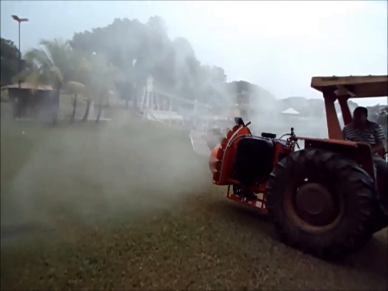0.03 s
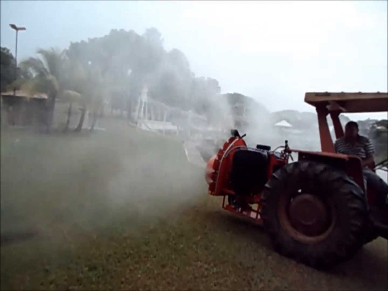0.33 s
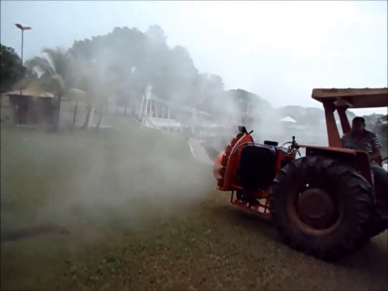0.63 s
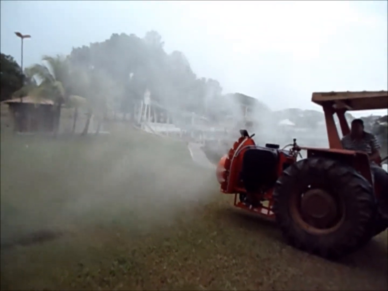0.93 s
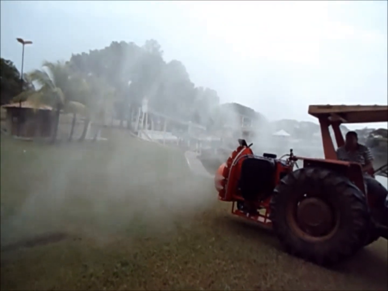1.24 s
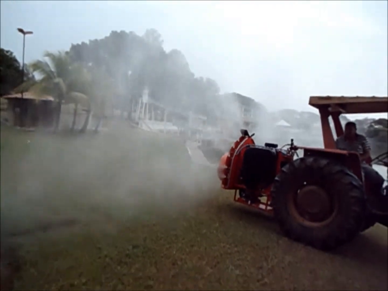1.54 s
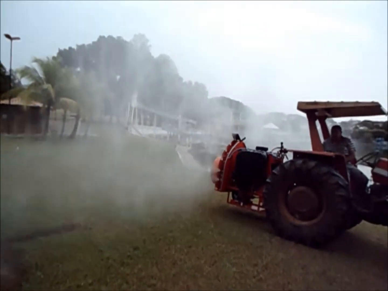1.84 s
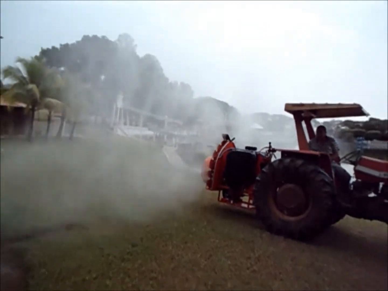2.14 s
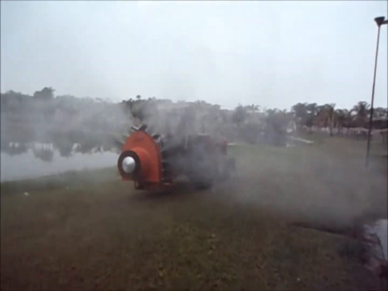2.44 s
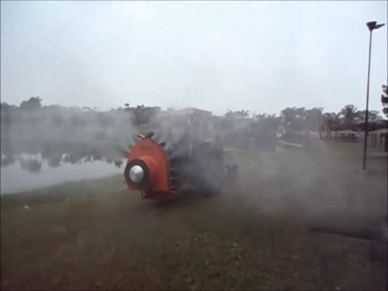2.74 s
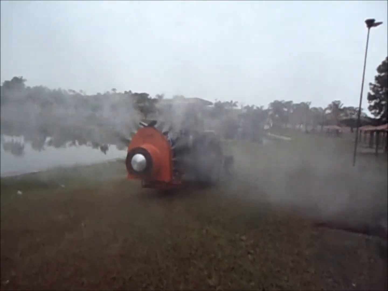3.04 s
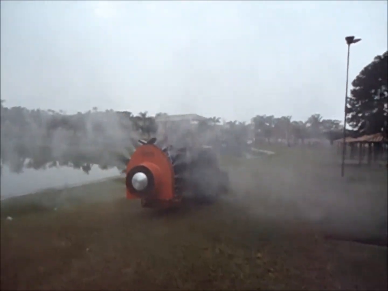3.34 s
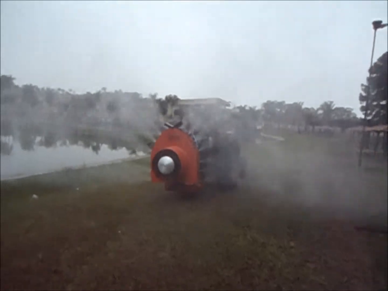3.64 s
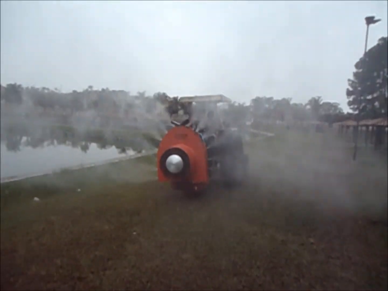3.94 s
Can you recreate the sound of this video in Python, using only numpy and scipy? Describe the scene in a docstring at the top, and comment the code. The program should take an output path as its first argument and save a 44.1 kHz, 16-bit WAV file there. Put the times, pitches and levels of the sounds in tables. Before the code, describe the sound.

A tractor-driven sprayer fan roars steadily over a knocking diesel engine.

```python
"""A four-cylinder diesel tractor drives an air-blast orchard sprayer across an open field.
We open on its side: uneven diesel knock, ticking injectors, gear whine and the fan's blade tone
over rushing air. A low drive whine fades as it pulls past, and the low mids hollow out.
At 2.3 s we cross to behind the fan: the knock drops back, the blade overtones flutter, and
a deeper, steadier roar takes over, with the exhaust throbbing through it."""
import sys
import numpy as np
from scipy import signal
from scipy.fft import rfft, irfft
from scipy.io import wavfile
from scipy.ndimage import uniform_filter1d, map_coordinates

SR = 44100
rng = np.random.default_rng(int(sys.argv[2]) if len(sys.argv) > 2 else 0)


def bounce(signal):
    """Save signal as a 16-bit WAV file at the path given by the first command-line argument."""
    frames = np.transpose(np.atleast_2d(signal))
    limited = np.clip(frames, -1, 1)
    pcm = np.round(limited * 32767).astype(np.int16)
    wavfile.write(sys.argv[1], SR, pcm)


N = 176400

CYCLE_HZ, BLADE_HZ = 11.144, 254.4  # engine cycles and blade passes per second, from the side
REAR_AT_S, CROSSFADE_S = 2.3, .11
KNOCK_RISE_S, KNOCK_REPEAT = .0011, .7  # attack and repeating share of both knock and rattle

# The cylinders in firing order. Each row: relative knock level in dB, decay in seconds.
CYLINDERS = [(-3.5, .016), (-1.2, .013), (0, .0095), (-8, .009)]
# The ring of the engine block. Each row: frequency in Hz, relative level in dB.
KNOCK_EQ = [(200, -24), (500, -13.5), (650, -4.5), (850, 0.5), (980, -3), (1150, -3.5), (1350, 0.5),
            (1530, 0.3), (1900, -6.5), (2400, -15), (3000, -19), (3450, -14), (4000, -22), (5200, -24.5)]
# The fader on the knock. Each row: time in seconds, level in dB.
KNOCK_FADER = [(0, -24), (.25, -20.5), (.9, -22.5), (1.5, -23.5), (2.2, -24.5), (2.4, -34), (4, -31.5)]
# The bright tick of injectors and valves. Each row: frequency in Hz, relative level in dB.
RATTLE_EQ = [(900, -24), (2000, -6.5), (2900, -3), (3450, 0), (4000, -3.5), (4400, 0.5), (5200, -4.5)]
# Firing hum and gear whine. Each row: multiple of the engine cycle rate (played rounded to a whole
# number), side level in dB, rear level in dB.
ENGINE_TONES = [(4, -56, -65), (8, -52, -57.5), (10, -55, -58), (14, -52, -43), (15, -53.5, -44),
                (36, -59, -44.5), (68, -33.5, -39), (77.9, -38, -47.5), (103.97, -30, -42),
                (126.3, -40, -53.5), (128, -34.5, -45.5), (156.5, -43, -47), (378, -53, -58.5)]
# The low drive whine fading as the tractor pulls past. Each row: time in seconds, level in dB.
DRIVE_FADER = [(0, -36), (1, -39), (1.6, -43.5), (2.2, -50), (4, -54.5)]
# The fan's partials. Each row: multiple of the blade rate, base level at the side in dB,
# base level at the rear in dB, shake depth from 0 to 1, shakes per second.
FAN_TONES = [(1, -28, -37.5, .14, 24), (2, -44, -27.5, 0.7, 45), (3, -34, -31, .9, 55)]
# The swell of the lowest blade tone. Each row: time in seconds, boost or cut in dB.
BLADE_SWELL = [(0, 0.5), (.5, .5), (1.15, -2), (1.3, 2.5), (1.9, 4.5), (2.25, 2.5), (2.6, -2), (4, -3)]
# Air rush and clatter from the side. Each row: frequency in Hz, relative level in dB.
SIDE_ROAR_EQ = [(25, -35.5), (60, -17.5), (125, -11.5), (180, -5), (280, 0.5), (345, -7), (480, -5),
                (650, 0.5), (830, 2.5), (980, 2.5), (1550, -0.5), (1950, -2.5), (2400, -7), (3050, -11),
                (3450, -8), (3950, -13), (4400, -14), (5100, -13.5)]
# The scoop in the side roar's low mids. Each row: time in seconds, boost or cut in dB.
LOW_MID_SCOOP = [(0, 0.5), (1, 0.5), (1.7, -0.5), (2.15, -5.5), (2.3, -5)]
# Air rush and clatter from behind the fan. Each row: frequency in Hz, relative level in dB.
REAR_ROAR_EQ = [(25, -35.5), (70, -23), (120, -19.5), (165, -3.5), (260, -3.5), (340, -9), (440, -4.5),
                (560, 1.5), (780, 2), (920, -1), (1250, -1), (1450, -4.5), (1560, -10), (1800, -4),
                (2400, -9), (2800, -12), (3150, -17), (3750, -13), (4400, -16.5), (5100, -18.5)]
# The fader on the roar. Each row: time in seconds, level in dB.
ROAR_FADER = [(0, -19.5), (1, -19.5), (1.7, -19), (2.2, -19.5), (2.45, -18), (3.1, -17), (3.6, -16.5),
              (4, -16.5)]
# The fader on the exhaust boom. Each row: time in seconds, level in dB.
EXHAUST_FADER = [(0, -44), (2.25, -49), (2.42, -34), (2.6, -36.5), (3.2, -39.5), (3.55, -30.5), (4, -38.5)]


def undb(db):
    """Decibels to gain."""
    return 10 ** (np.asarray(db) / 20)


def unit(x):
    """Scale to rms 1."""
    return x / np.sqrt(np.mean(x ** 2))


def curve(rows):
    """Join (seconds, value) rows by straight lines."""
    return np.interp(np.arange(N) / SR, *np.array(rows).T)


def walk(rate):
    """A smooth random drift that turns about rate times a second; rms 1."""
    hold = int(SR / rate)
    steps = np.repeat(rng.standard_normal(N // hold + 1), hold)
    return unit(uniform_filter1d(uniform_filter1d(steps, hold), hold)[:N])


def equalise(x, points):
    """Shape a sound by (Hz, dB) points; rms 1."""
    hz, db = np.array(points).T
    bins_hz = np.maximum(np.fft.rfftfreq(N, 1 / SR), 1)
    gain = undb(np.interp(np.log(bins_hz), np.log(hz), db))
    return unit(irfft(rfft(x) * gain, N))


def perspective(side_db, rear_db, rear):
    """Gain of a source as we move from the side (rear = 0) to behind the fan (rear = 1)."""
    return undb(side_db + rear * (rear_db - side_db))


def clatter(cycles, repeat):
    """Noise with a share of its power, repeat, looping once per engine cycle."""
    size = int(SR / CYCLE_HZ)
    pattern = irfft(np.exp(2j * np.pi * rng.random(size // 2 + 1)), size)
    loop = unit(map_coordinates(pattern, [cycles % 1 * size], order=3, mode="grid-wrap"))
    return np.sqrt(repeat) * loop + np.sqrt(1 - repeat) * rng.standard_normal(N)


def tone(turns, depth, rate):
    """A partial whose strength and phase are shaken by the moving air; rms 1."""
    shake = 1 + depth * (walk(rate) + 1j * walk(rate)) / np.sqrt(2)
    return unit(np.real(shake * np.exp(2j * np.pi * (turns + rng.random()))))


def firings(cycles):
    """Number of the latest firing and the seconds since it."""
    beats = (cycles + 1) * len(CYLINDERS)
    return beats.astype(int), beats % 1 / (CYCLE_HZ * len(CYLINDERS))


def diesel_knock(cycles):
    """Each firing rattles the engine block; one cylinder knocks hardest."""
    number, age = firings(cycles)
    db, decay = np.array(CYLINDERS)[number % len(CYLINDERS)].T
    scatter_db = rng.standard_normal(size=256)[number]
    burst = undb(db + scatter_db) * (1 - np.exp(-age / KNOCK_RISE_S)) * np.exp(-age / decay)
    return equalise(burst * clatter(cycles, KNOCK_REPEAT), KNOCK_EQ) * undb(curve(KNOCK_FADER))


def injector_rattle(cycles, rear, decay_s=.005):
    """Injectors and valves add a bright tick to every firing."""
    _, age = firings(cycles)
    burst = (1 - np.exp(-age / KNOCK_RISE_S)) * np.exp(-age / decay_s)
    ticks = equalise(burst * clatter(cycles, KNOCK_REPEAT), RATTLE_EQ)
    return ticks * perspective(side_db=-32, rear_db=-45.5, rear=rear)


def hum_and_whine(cycles, rear):
    """Firing hum, gear whine and a low drive whine, all locked to the crankshaft."""
    partials = sum(tone(round(multiple) * cycles, depth=.25, rate=10) * perspective(side, back, rear)
                   for multiple, side, back in ENGINE_TONES)
    drive = tone(34 * cycles, depth=.25, rate=8.4)
    return partials + drive * undb(curve(DRIVE_FADER))


def fan_blades(cycles, rear, wander=.002, shift_db_per_s=3.5):
    """The clean blade tone leads at the side, its fluttering overtones behind the fan."""
    passes = cycles * BLADE_HZ / CYCLE_HZ + np.cumsum(wander * BLADE_HZ * walk(6)) / SR
    first, second, third = [tone(multiple * passes, depth, rate) * perspective(side, back, rear)
                            for multiple, side, back, depth, rate in FAN_TONES]
    # As the sprayer draws away, the second partial gives way to the third.
    shift = undb(shift_db_per_s * np.cumsum(rear) / SR)
    return first * undb(curve(BLADE_SWELL)) + second / shift + third * shift


def air_roar(cycles, rear):
    """Turbulent air and spray rush from the fan, mixed with the clatter of the drive."""
    side = equalise(clatter(cycles, repeat=.38), SIDE_ROAR_EQ)
    low_mid_band = signal.butter(2, [370, 610], "band", fs=SR, output="sos")
    side += signal.sosfiltfilt(low_mid_band, side) * (undb(curve(LOW_MID_SCOOP)) - 1)
    back = equalise(clatter(cycles, repeat=.19), REAR_ROAR_EQ)
    rush = np.sqrt(1 - rear) * side + np.sqrt(rear) * back
    flutter_db = .44 * walk(26)
    return rush * undb(curve(ROAR_FADER) + flutter_db)


def exhaust_boom(cycles, pipe_hz=171.2, width_hz=62, decay_s=.0055):
    """A puff per firing booms in the exhaust pipe, coming forward once we are behind the fan."""
    _, age = firings(cycles)
    puffs = np.exp(-age / decay_s) * clatter(cycles, repeat=.15)
    pipe = signal.iirpeak(pipe_hz, pipe_hz / width_hz, fs=SR)
    boom = signal.lfilter(*pipe, signal.lfilter(*pipe, puffs))  # two passes tighten the ring
    return unit(boom) * undb(curve(EXHAUST_FADER))


def scene():
    """One governed shaft drives every layer while we move from the side to the rear."""
    t = np.arange(N) / SR
    rear = np.clip((t - REAR_AT_S) / CROSSFADE_S + .5, 0, 1)
    speed = 1 + .008 * rear + .0004 * walk(4)  # a touch faster from behind, with a slight wander
    cycles = CYCLE_HZ * (np.cumsum(speed) / SR - .0085)  # the first firing lands at 8.5 ms
    engine = diesel_knock(cycles) + injector_rattle(cycles, rear)
    engine += exhaust_boom(cycles) + hum_and_whine(cycles, rear)
    return (engine + fan_blades(cycles, rear) + air_roar(cycles, rear))[None]


def record(dry, cutoff_hz=5250):
    """A steep low-pass takes the top off the whole mix."""
    taps = signal.firwin(301, cutoff_hz, window=("kaiser", 8), fs=SR)
    return signal.fftconvolve(dry, taps[None], mode="same")


dry = scene()
out = record(dry)
bounce(out)
```